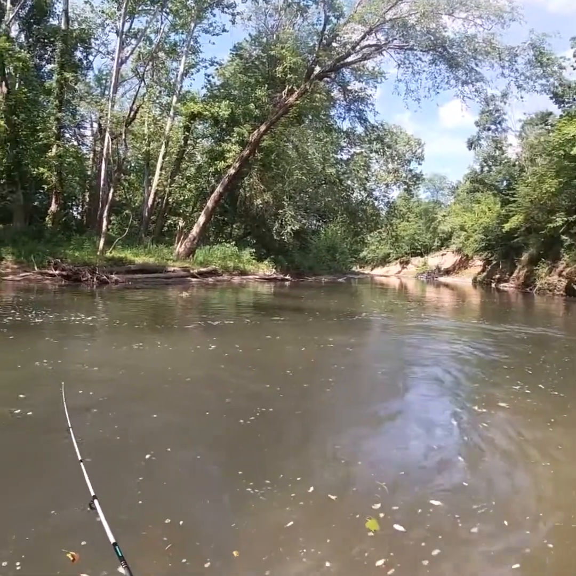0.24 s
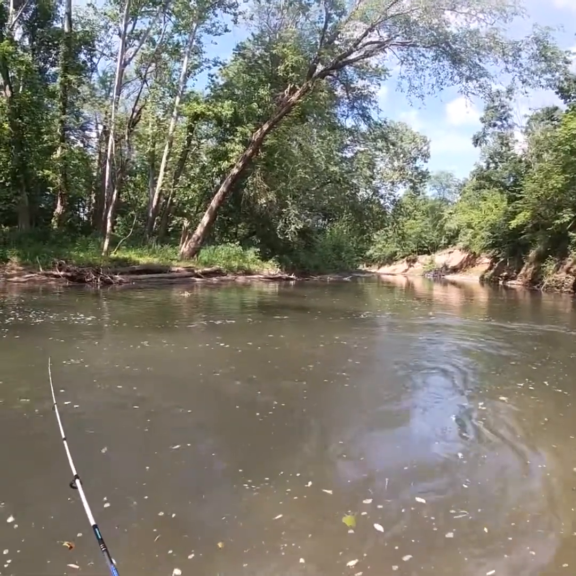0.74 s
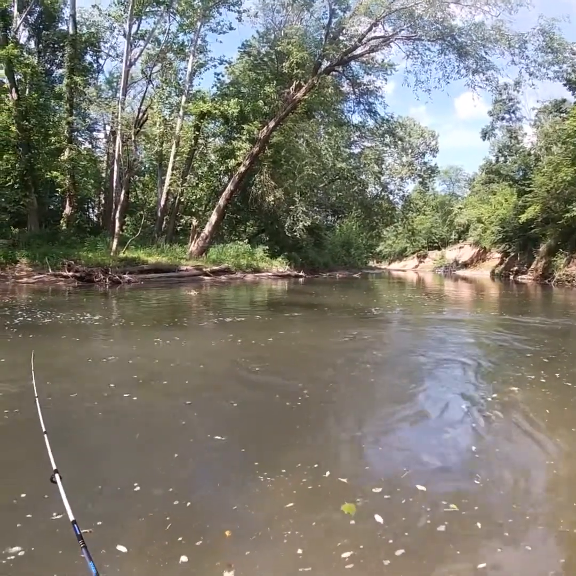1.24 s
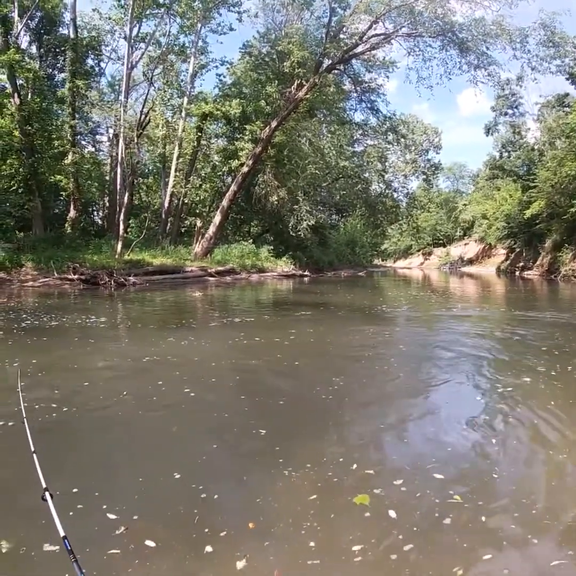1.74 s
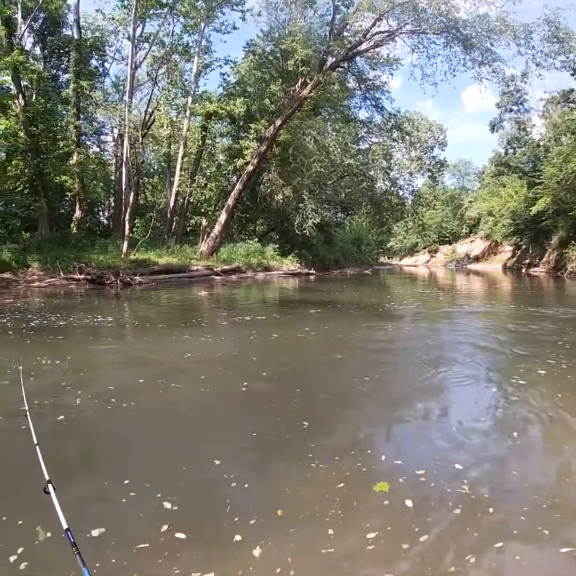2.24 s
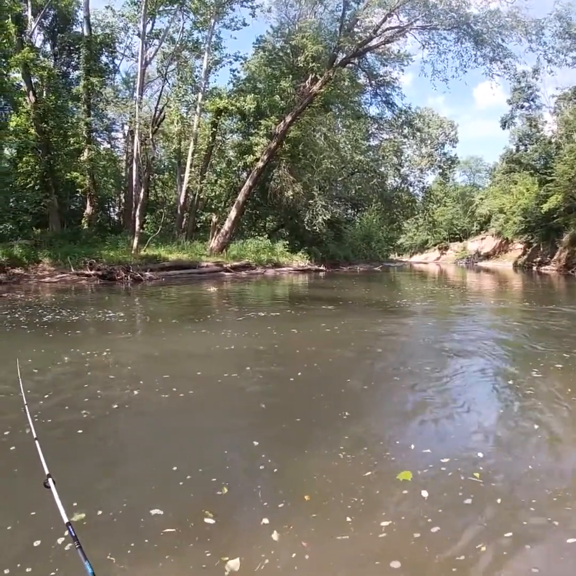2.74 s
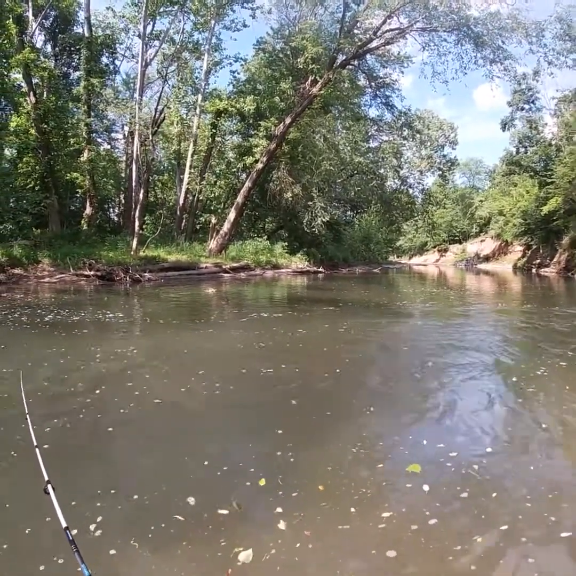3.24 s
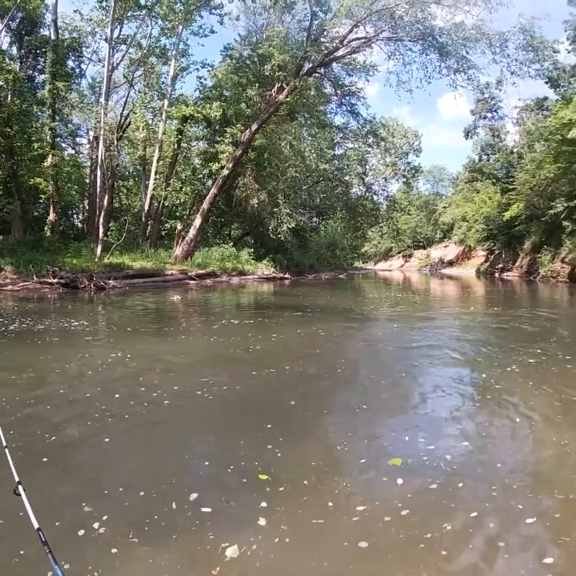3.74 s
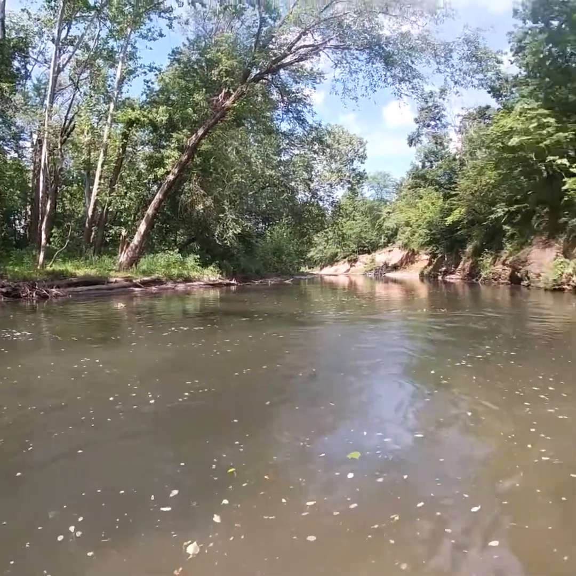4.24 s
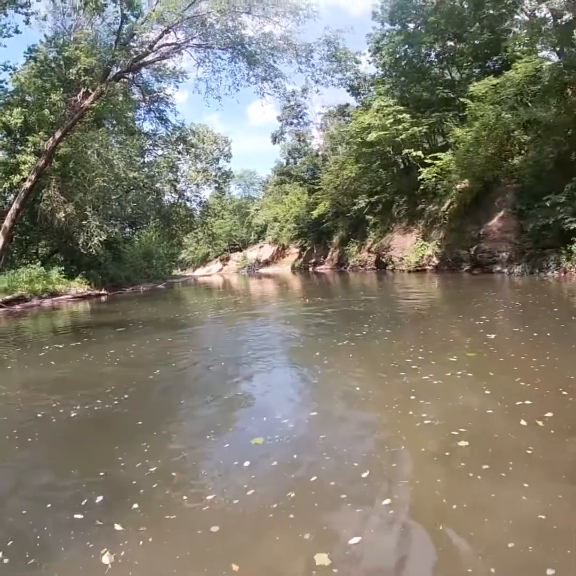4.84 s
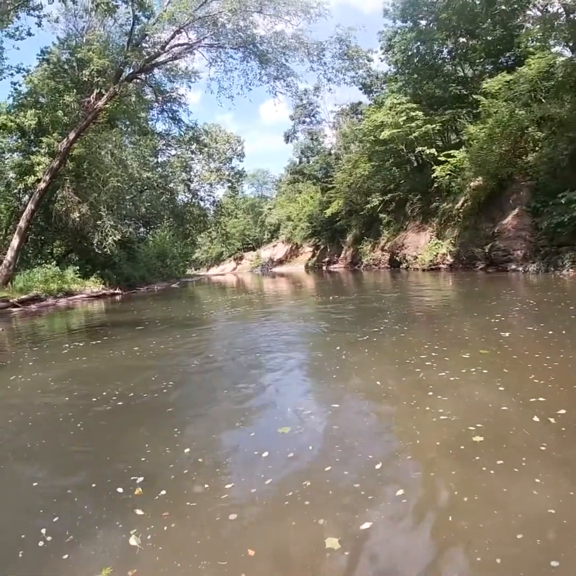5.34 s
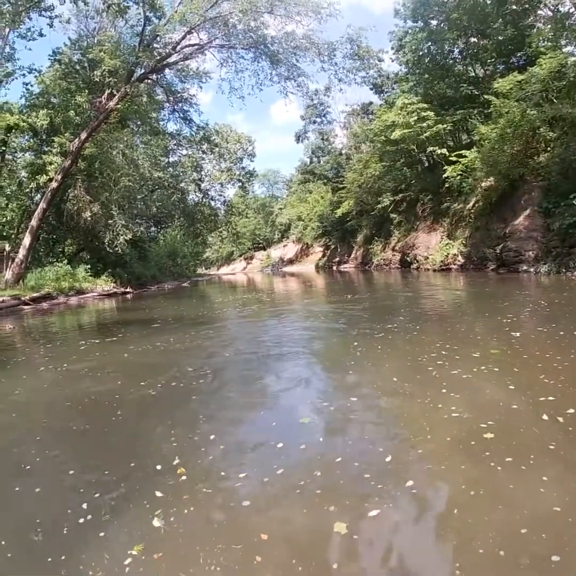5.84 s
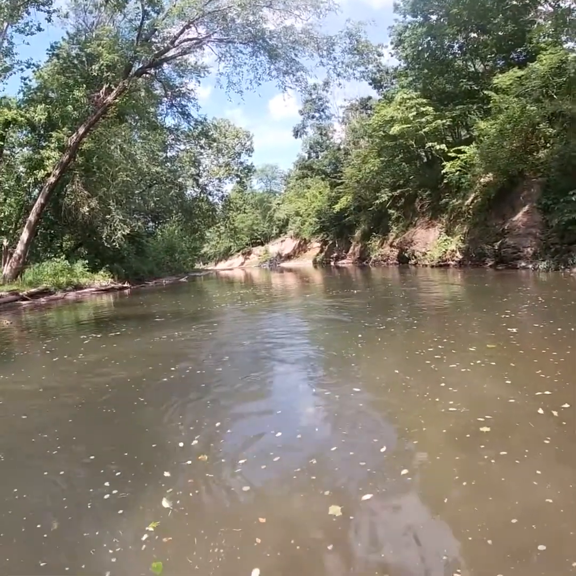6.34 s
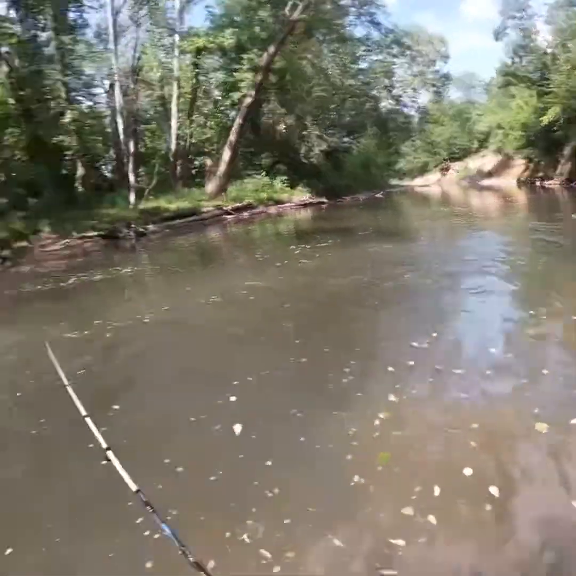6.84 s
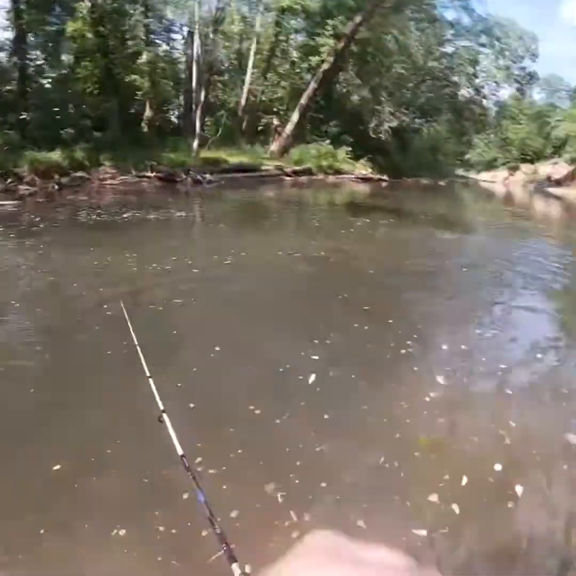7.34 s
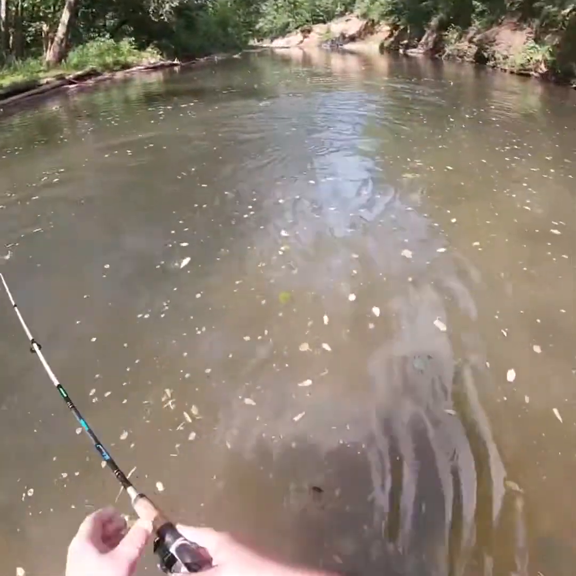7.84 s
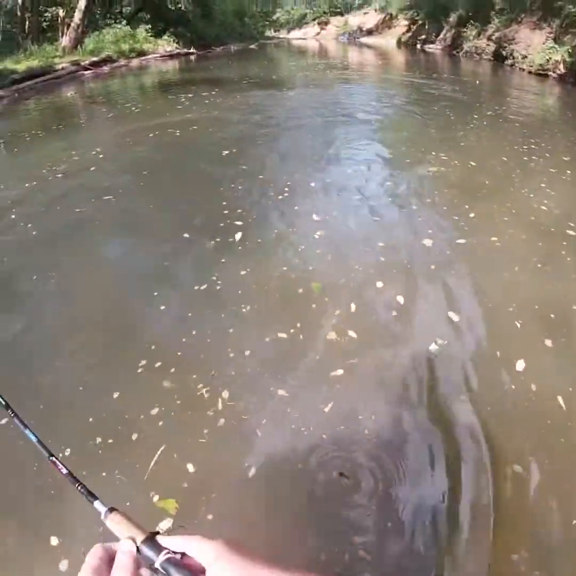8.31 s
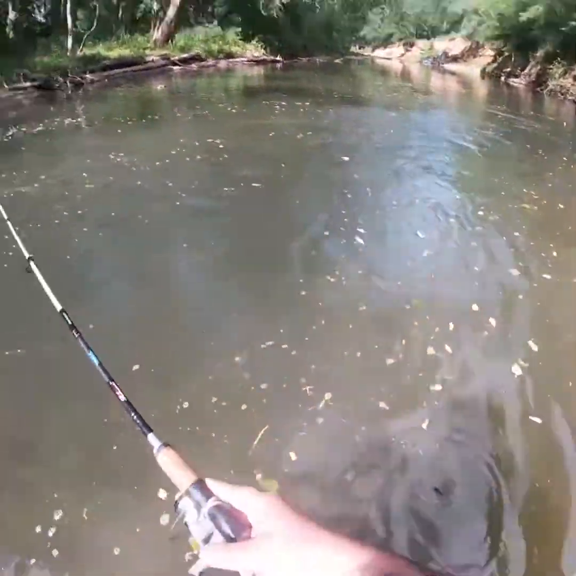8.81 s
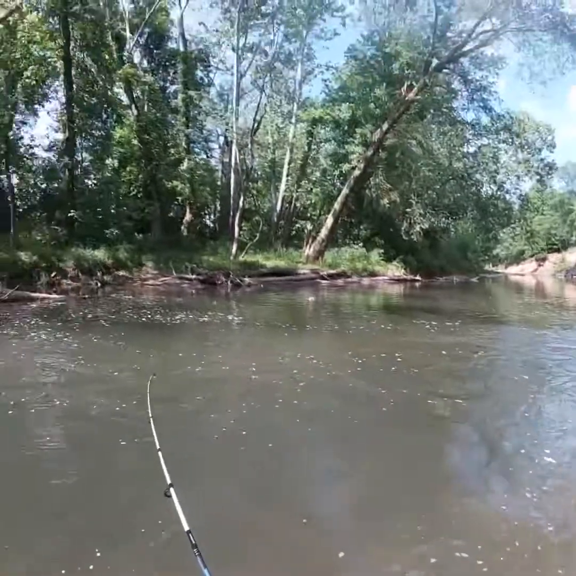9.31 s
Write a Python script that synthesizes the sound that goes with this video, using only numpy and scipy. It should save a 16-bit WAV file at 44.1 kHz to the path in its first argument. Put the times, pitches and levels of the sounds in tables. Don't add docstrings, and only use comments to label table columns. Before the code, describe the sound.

A loud high cicada chorus buzzes and swells over a wooded creek, with faint lapping water, tiny bird chirps, drips and distant low rumble.

```python
import sys
import numpy as np
from scipy import signal
from scipy.fft import rfft, irfft, next_fast_len
from scipy.io import wavfile

SR = 44100
rng = np.random.default_rng(int(sys.argv[2]) if len(sys.argv) > 2 else 0)


def wav_record(signal):
    frames = np.transpose(np.atleast_2d(signal))
    bounded = np.clip(frames, -1, 1)
    quanta = np.round(bounded * 32767).astype(np.int16)
    wavfile.write(sys.argv[1], SR, quanta)


def makeup_ratio(level_db):
    decades = np.asarray(level_db, float) / 20
    return 10 ** decades


N = 422037
TIME_S = np.arange(N) / SR


def rms_one(x):
    return x / np.sqrt(np.mean(x ** 2) + 1e-20)


def in_time(rows):
    start_s, *columns = np.transpose(rows)
    return [np.interp(TIME_S, start_s, column) for column in columns]


def colour(x, spectrum):
    size = next_fast_len(N)
    hz, level_db = np.transpose(spectrum)
    log_hz = np.log(np.maximum(np.arange(size // 2 + 1) * SR / size, 1))
    gain = makeup_ratio(np.interp(log_hz, np.log(hz), level_db))
    return rms_one(irfft(rfft(x, size) * gain, size)[:N])


def coloured_noise(spectrum):
    return colour(rng.standard_normal(N), spectrum)


def drift(rate):
    pole = np.exp(-80 * np.pi * rate / SR)
    slow = signal.lfilter([1], [1, -2 * pole, pole * pole], rng.standard_normal(N // 40 + 2002))[2000:]
    return np.interp(np.arange(N) / 40, np.arange(len(slow)), rms_one(slow - slow.mean()))


def swells(rows, between_db, flat):
    power = makeup_ratio(2 * between_db)
    for middle_s, peak_db, half_s in rows:
        power = power + makeup_ratio(2 * peak_db) * np.exp(-np.abs((TIME_S - middle_s) / half_s) ** flat)
    return 10 * np.log10(power)


def whistles(rows, rough_db):
    out = np.zeros(N)
    for start_s, start_hz, end_hz, length_s, peak_db in rows:
        n, at = int(length_s * SR), int(start_s * SR)
        phase = 2 * np.pi * np.cumsum(np.linspace(start_hz, end_hz, n)) / SR
        out[at:at + n] += makeup_ratio(peak_db) * np.hanning(n) ** .6 * np.sin(phase)
    return out * makeup_ratio(rough_db * drift(60.0))


def rib_snaps(per_s, spread_db):
    sizes = makeup_ratio(spread_db * rng.standard_normal(N)) * rng.choice([-1, 1], N)
    return sizes * (rng.random(N) < per_s / SR)


def high_chorus():
    # start_s [s], level_db [dB]
    chorus = [(0.0, -21), (0.4, -20.5), (1.2, -19.5), (1.7, -20), (3.2, -25), (4.2, -24.5), (4.75, -23),
              (5.2, -22.5), (5.6, -21), (7.1, -19.5), (8.6, -25.5), (9.57, -23)]
    # pitch_hz [Hz], level_db [dB per Hz]
    tymbal = [(1900, -65.5), (2890, -33), (3770, -16.5), (4570, -12.5), (5180, -3), (5670, 0.5), (6390, -4),
              (7300, -15), (8200, -21.5), (9100, -36), (10000, -39.5), (11300, -46.5), (13300, -51),
              (15000, -76)]
    level_db, = in_time(chorus)
    smooth = 1.42 * rng.standard_normal(N)
    buzz = rms_one(rib_snaps(per_s=9000.0, spread_db=2.5)) + smooth
    return makeup_ratio(level_db + 0.26 * drift(6.5)) * colour(buzz, tymbal)


def far_chorus():
    # pitch_hz [Hz], level_db [dB per Hz]
    far_trees = [(1500, -34), (2300, -19.5), (3000, -8), (3800, 6.5), (4600, 5.5), (6000, -30),
                 (12000, -80)]
    return makeup_ratio(-42) * coloured_noise(far_trees)


def narrow(hz, width_hz):
    sos = signal.butter(2, width_hz / 2, fs=SR, output="sos")
    a, b = signal.sosfilt(sos, rng.standard_normal((2, N + 8000)))[:, 8000:]
    phase = 2 * np.pi * np.cumsum(hz) / SR
    return rms_one(a * np.cos(phase) + b * np.sin(phase))


def low_drone():
    # start_s [s], level_db [dB], pitch_hz [Hz]
    drone = [(0.0, -49.5, 1352), (0.4, -53.5, 1319), (0.7, -53, 1341), (1.7, -55, 1360), (2.9, -53.5, 1344),
             (3.5, -50, 1336), (4.7, -49, 1366), (5.6, -52.5, 1343), (6.2, -55, 1357), (7.8, -56, 1341),
             (9.1, -50.5, 1364), (9.57, -50, 1338)]
    level_db, hz = in_time(drone)
    core = narrow(hz, width_hz=80)
    skirt = makeup_ratio(-1.5) * narrow(hz - 25, width_hz=270)
    return makeup_ratio(level_db - 1.05 + 0.69 * drift(12.0)) * rms_one(core + skirt)


def valley_level():
    valley = [(0.0, -58), (0.3, -62), (1.9, -64), (2.45, -59), (3.1, -54.5), (3.4, -57.5), (3.7, -52),
              (4.1, -57), (5.0, -57), (5.75, -55.5), (6.05, -60), (7.8, -61), (8.9, -55.5), (9.57, -57.5)]
    return in_time(valley)[0]


def creek(valley_db):
    # middle_s [s], peak_db [dB], half_length_s [s]
    waves = [(.1, -62.5, 0.23), (.73, -59.5, 0.22), (1.2, -70, 0.17), (1.8, -68.5, .3), (2.45, -62, .23),
             (3.55, -65.5, 0.14), (4.3, -62.5, 0.28), (5.3, -64.5, 0.14), (5.8, -64.5, .2),
             (6.65, -64.5, 0.084), (7.2, -66, 0.3), (7.7, -68, 0.16), (8.45, -61, 0.24),
             (9.12, -61.5, 0.19), (9.55, -65, 0.13)]
    # pitch_hz [Hz], level_db [dB per Hz]
    lapping_spectrum = [(60, -25), (150, -3), (220, -0.5), (400, -3), (600, -15), (1000, -20), (5000, -90)]
    # pitch_hz [Hz], level_db [dB per Hz]
    riffle_spectrum = [(60, -50), (150, -16), (300, -16), (500, 1.5), (1000, 3), (1700, 0), (2400, -2.5),
                       (4000, -12), (12000, -70)]
    lapping_db = swells(waves, between_db=-68.5, flat=4.1)
    riffle_db = -58.5 + .4 * (valley_db - valley_db.mean())
    riffle_db += 0.27 * (lapping_db - lapping_db.mean())
    riffle = makeup_ratio(riffle_db + 1.06 * drift(9.4)) * coloured_noise(riffle_spectrum)
    lapping = makeup_ratio(lapping_db + 1.9 * drift(4.0)) * coloured_noise(lapping_spectrum)
    return riffle + lapping


def road_rumble(valley_db):
    rumble = [(25, -18), (45, 4), (70, 2), (100, -1), (150, 1), (200, -8), (300, -54), (2000, -100)]
    return makeup_ratio(valley_db + 0.2) * coloured_noise(rumble)


def wind_buffet():
    # middle_s [s], peak_db [dB], half_length_s [s]
    puffs = [(.06, -53, 0.06), (.63, -62, .09), (1.08, -60, 0.077), (3.2, -59, 0.075), (4.3, -55.5, 0.12),
             (5.06, -73, .07), (5.3, -65, 0.067), (6.33, -51.5, 0.059), (6.75, -50, 0.18),
             (7.2, -44.5, 0.37), (7.38, -41, 0.047), (7.7, -49.5, .2), (8.2, -63, .25), (8.9, -50.5, .3),
             (9.38, -70, 0.074)]
    # pitch_hz [Hz], level_db [dB per Hz]
    buffet = [(8, -1.5), (16, 5.5), (28, -4.5), (45, -15), (80, -38), (150, -53), (1000, -110)]
    level_db = swells(puffs, between_db=-70, flat=4.4)
    return makeup_ratio(level_db + 0.68 * drift(5.0)) * coloured_noise(buffet)


def firings():
    # start_s [s], peak_db [dB]
    turns = [(0.056, -49.5), (0.541, -51), (1.08, -52), (1.622, -54), (2.114, -50.5), (2.656, -52),
             (3.164, -49.5), (3.703, -50), (4.25, -48.5), (4.799, -48), (5.301, -49.5), (5.817, -50.5),
             (6.308, -51), (6.836, -51.5), (7.328, -50.5), (7.847, -53), (8.349, -50), (8.869, -48.5),
             (9.352, -48.5)]
    start_s, peak_db = np.transpose(turns)
    second_s = start_s[:-1] + .505 * np.diff(start_s)
    second_db = (peak_db[:-1] + peak_db[1:]) / 2
    return list(zip(start_s, peak_db)) + list(zip(second_s, second_db))


def pump_engine():
    # pitch_hz [Hz], level_db [dB], lag_s [s], swell_s [s]
    exhaust = [
        (55, 0, 0.00023, 0.047),
        (84.7, -13, 0.0215, 0.052),
        (112.6, -8.5, 0.0304, 0.016),
    ]
    out = np.zeros(N)
    for start_s, peak_db in firings():
        near = slice(max(int((start_s - .2) * SR), 0), int((start_s + .25) * SR))
        luck = rng.random((len(exhaust), 2))
        for k, (hz, level_db, lag_s, swell_s) in enumerate(exhaust):
            age = TIME_S[near] - start_s - lag_s
            uneven_db = 4.1 * (luck[k, 1] + 1.0) if k else 0
            gain = makeup_ratio(peak_db + level_db + 0.5 + uneven_db)
            swell = np.exp(-.5 * (age / swell_s) ** 2)
            out[near] += gain * swell * np.sin(2 * np.pi * (hz * age + luck[k, 0]))
    return out


def near_singers():
    slurs = [
        (.2, 1313, 1314, 0.95, -59),
        (.5, 1355, 1397, 1.5, -65),
        (2.31, 1170, 930, .09, -59.5),
        (2.3, 1320, 1335, 1.2, -67),
        (3.3, 1357, 1389, 0.74, -58),
        (4.2, 1367, 1428, 0.98, -58.5),
        (5.2, 1366, 1350, 0.78, -59),
        (6.13, 1144, 880, 0.15, -63.5),
        (8.65, 1368, 1407, .9, -58.5),
    ]
    return makeup_ratio(1.5) * whistles(slurs, rough_db=3.0)


def bird():
    chirps = [(.44, 2750, 2450, .016, -55), (.476, 2800, 2430, .02, -51), (.508, 2470, 2700, .032, -48),
              (.612, 2800, 2480, .024, -52), (1.62, 2750, 2550, .022, -52), (2.76, 2750, 2450, .02, -55),
              (4.02, 2500, 2650, .03, -52), (4.10, 2750, 2550, .025, -50), (5.095, 2800, 2300, .03, -52),
              (5.14, 2660, 2540, .042, -50), (5.172, 2560, 2850, .035, -48.5),
              (5.232, 2900, 2300, .042, -52), (8.428, 2680, 2470, .038, -48.5),
              (8.592, 2800, 2380, .032, -50)]
    return whistles(chirps, rough_db=.8)


def drops():
    # start_s [s], peak_db [dB], pitch_hz [Hz], t60_s [s], tick_db [dB]
    falls = [(.798, -53, 1560, .02, -4), (6.622, -56, 244, 0.055, -20), (6.9821, -31, 1830, 0.017, -17),
             (7.028, -48, 260, 0.038, -25), (7.105, -47, 1400, 0.022, -17), (7.344, -52, 1650, 0.027, -14),
             (7.485, -53, 1700, 0.014, -8), (7.713, -54, 2043, .014, -1), (7.714, -46, 1400, .015, -20),
             (8.379, -40.5, 1970, 0.0079, -4.5), (8.984, -54, 1800, 0.016, -7), (9.023, -58, 2523, .006, 3),
             (9.447, -48, 540, 0.044, -20)]
    out, age = np.zeros(N), np.arange(int(.12 * SR)) / SR
    band = signal.butter(3, [1600, 2600], "band", fs=SR, output="sos")
    tick = signal.sosfilt(band, age == 0)
    tick = tick / tick.max()
    for start_s, peak_db, hz, t60_s, tick_db in falls:
        swell = (1 - np.exp(-age / 0.0016)) * makeup_ratio(-60 * (age / t60_s) ** 2)
        bubble = swell / swell.max() * np.sin(2 * np.pi * hz * age * (1 + .9 * age))
        drop = makeup_ratio(peak_db) * (bubble + makeup_ratio(tick_db + 13.5) * tick)
        at = int(start_s * SR)
        out[at:at + len(age)] += drop[:N - at]
    return out


def motor_tone(rows):
    hz, level_db = in_time(rows)
    first_s, last_s = rows[0][0], rows[-1][0]
    fade = np.clip(np.minimum(TIME_S - first_s, last_s + 0.23 - TIME_S) / 0.21, 0, 1)
    tone = np.sqrt(2) * np.sin(2 * np.pi * np.cumsum(hz) / SR)
    return fade * makeup_ratio(level_db + 1.5 * drift(5.5)) * tone


def road_hum():
    # start_s [s], pitch_hz [Hz], level_db [dB]
    high_hum = [
        (1.9, 166.6, -71),
        (2.5, 164, -61.5),
        (3.1, 159.6, -68),
    ]
    # start_s [s], pitch_hz [Hz], level_db [dB]
    low_hum = [
        (4.9, 124.8, -69),
        (5.55, 125.3, -58),
        (6.2, 127.2, -71),
        (6.9, 128.5, -63.5),
        (7.7, 129.6, -68),
        (8.8, 128.3, -59),
        (9.57, 130, -56.5),
    ]
    return motor_tone(high_hum) + motor_tone(low_hum)


def scene():
    valley_db = valley_level()
    insects = high_chorus() + far_chorus() + low_drone() + near_singers()
    water = creek(valley_db) + drops()
    far = road_rumble(valley_db) + pump_engine() + road_hum()
    return (insects + water + far + wind_buffet() + bird())[None]


def top_cut(x):
    return signal.sosfilt(signal.butter(12, 15750, fs=SR, output="sos"), x)


def record(dry):
    return top_cut(dry)


dry = scene()
out = record(dry)
wav_record(out)
```